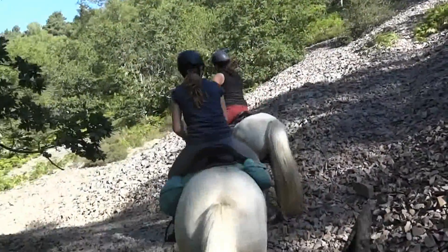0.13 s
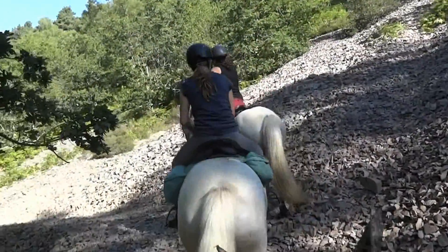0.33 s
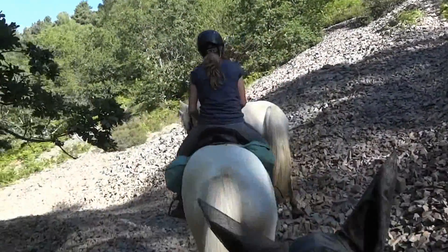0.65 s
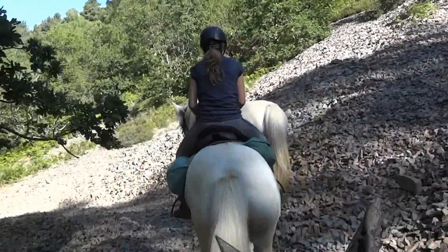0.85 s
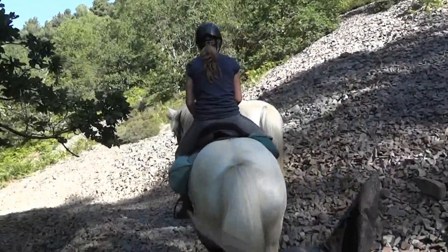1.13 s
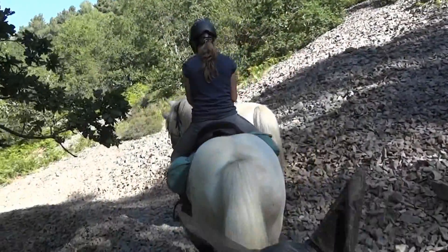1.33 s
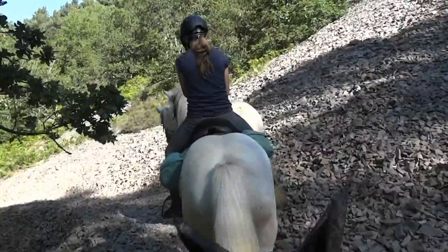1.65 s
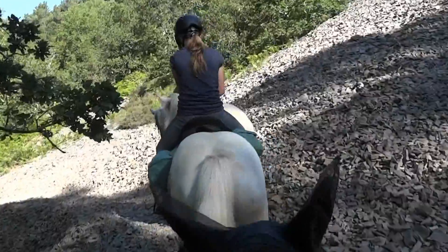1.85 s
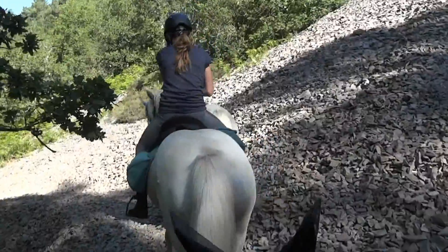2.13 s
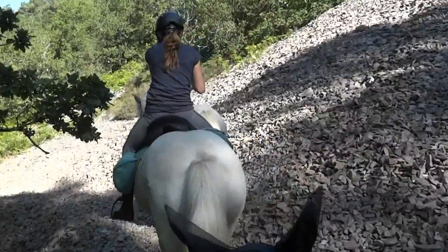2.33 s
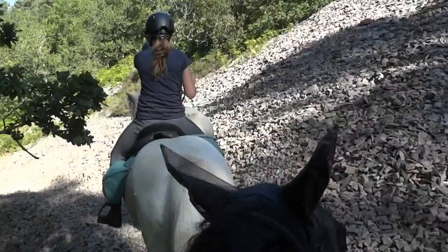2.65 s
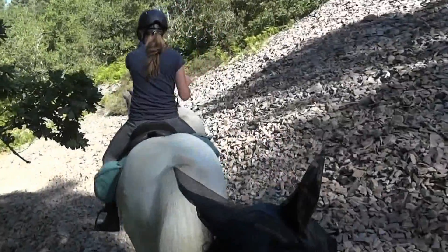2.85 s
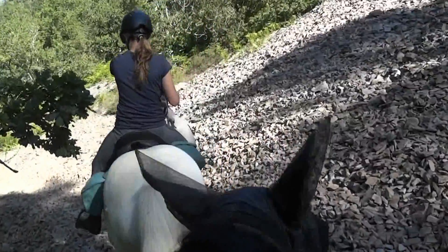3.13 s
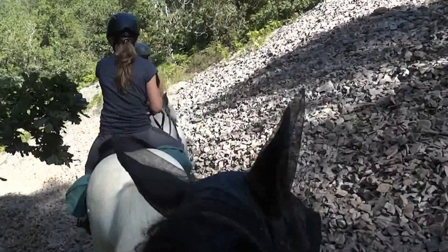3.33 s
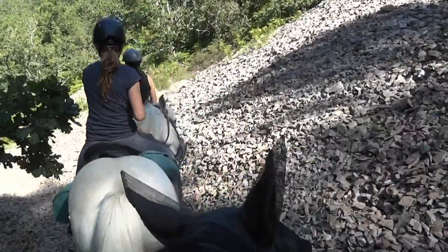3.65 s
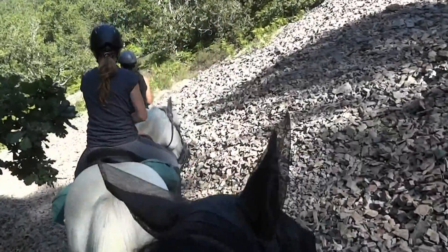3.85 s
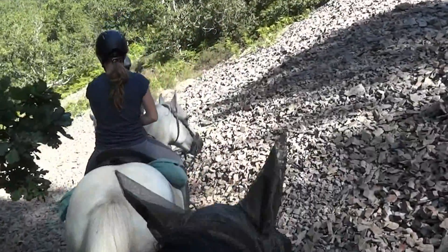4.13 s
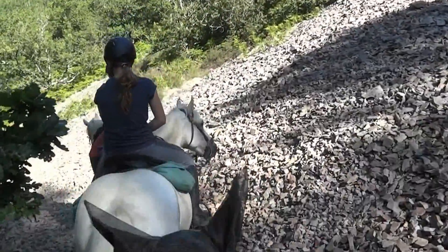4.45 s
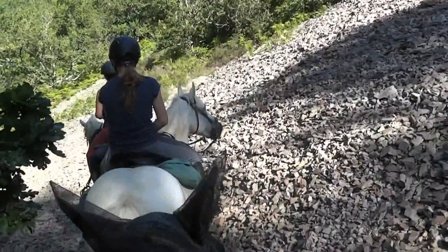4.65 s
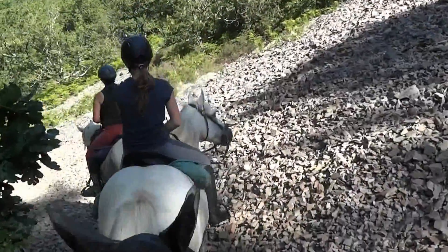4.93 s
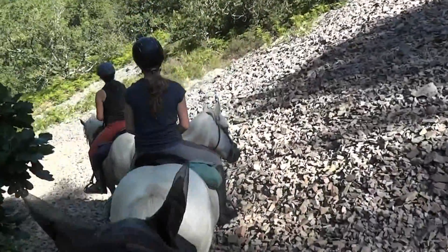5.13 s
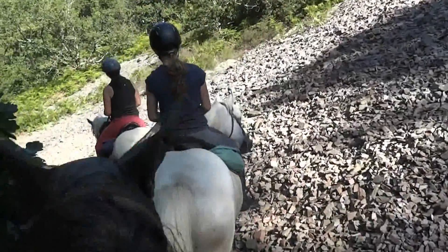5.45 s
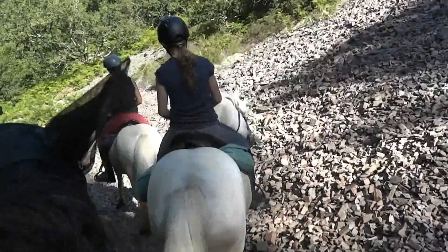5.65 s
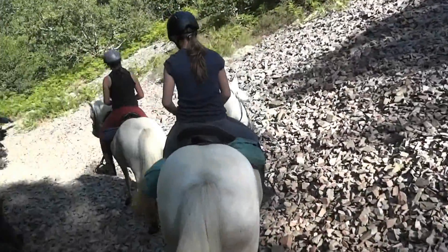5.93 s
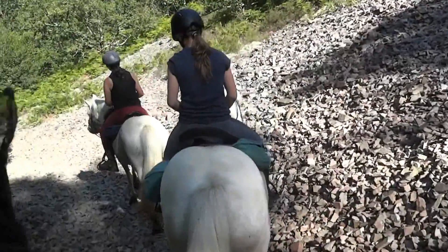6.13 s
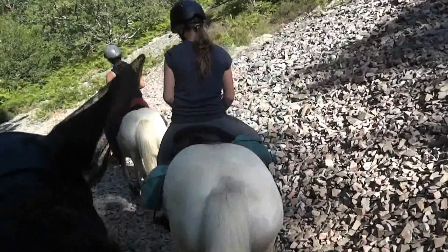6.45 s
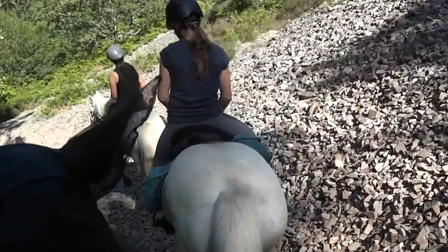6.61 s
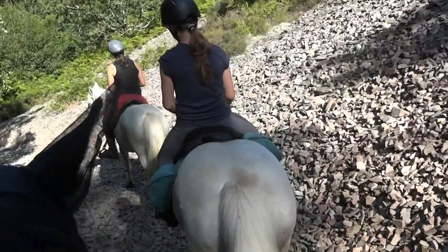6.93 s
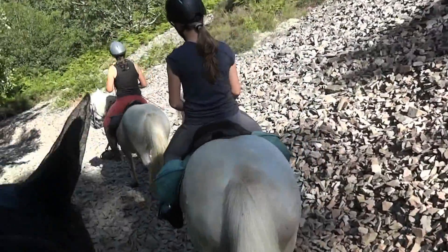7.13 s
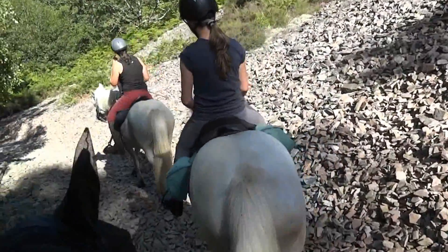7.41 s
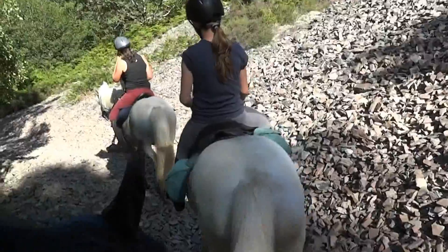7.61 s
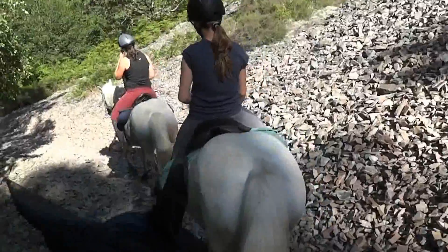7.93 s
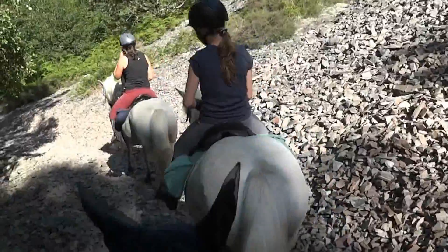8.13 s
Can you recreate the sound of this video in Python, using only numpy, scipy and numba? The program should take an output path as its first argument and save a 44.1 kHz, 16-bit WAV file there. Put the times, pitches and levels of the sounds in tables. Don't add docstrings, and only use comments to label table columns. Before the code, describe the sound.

From 0 s, already in full motion, horses' hooves crunch through loose stones on an outdoor slope, close around the microphone in the saddle. Thousands of tiny stone contacts make a dry, gritty, rattling bed, swelling and easing unevenly with overlapping steps. A hard clink and crush stands out at 0.6 s after a brief lull begins; heavy sinking crunches and knocks follow until about 3 s, with a strong slide near 3.3 s and a dip at 3.6 s. Around 4.5 s fine grit thins, leaving clearer pebble drags. A fuller slide comes at 5 s, then heavy stones fade and the texture turns lighter and brighter, with clinks at 6.0 and 6.6 s, a busy rattle from 7.1 to 7.3 s, and crisp crunches until the 8.3 s cut-off. The stereo leans slightly left; bass is weak, peaks compressed, the bank's scatter very short.

```python
import sys
import numpy as np
from scipy import signal
from scipy.io import wavfile
from scipy.ndimage import uniform_filter1d
from numba import njit

SR = 44100
rng = np.random.default_rng(int(sys.argv[2]) if len(sys.argv) > 2 else 0)


def master(y):
    cut = np.clip(np.atleast_2d(y).T, -1, 1)
    pcm = np.round(cut * 32767)
    wavfile.write(sys.argv[1], SR, pcm.astype(np.int16))


def amplitude_ratio(level_db):
    exponent = np.asarray(level_db, float) / 20
    return 10 ** exponent


N = 365148

# time in seconds, level against the mean in dB.
SLIDE = [(0.0, -4.5), (0.33, -3.5), (0.66, -14.5), (0.99, -4), (1.32, -6.5), (1.8, -4), (2.31, -8.5),
         (2.7, -4), (3.29, -1.5), (3.62, -12.5), (4.5, -8), (4.94, -3), (5.27, -8), (5.6, -6.5),
         (5.93, -8.5), (6.92, -10.5), (7.24, -3), (8.28, -9.5)]
# frequency in Hz, level in dB per Hz.
COLOUR = [(13, -70), (22, -32), (70, -33.5), (159, -10.5), (283, -5.5), (439, -5.5), (546, -6), (920, -1),
          (1280, -3), (3000, -0.5), (4910, -2), (6830, -8), (12800, -27), (15600, -37.5)]


def scree():
    grains, modes_each = 132000, 4
    contacts = grains // modes_each
    s = np.repeat(np.sort(rng.random(contacts)), modes_each) * N / SR
    blow = np.repeat(rng.exponential(1, contacts), modes_each)
    pick, turns, large = rng.random(grains), rng.random(grains), rng.exponential(1, grains)
    chance = rng.standard_normal((grains, 2)) * [9, 1]
    hz = (7 + pick * 119) ** 2
    t60 = 6.5 * 7.3 ** turns / hz + 0.0099

    level_db = np.interp(s, *np.transpose(SLIDE))
    heavy_db = -2.5 * np.maximum(s - 5, 0)
    grit_db = 1.2 + (0.51 - 1) * level_db
    grit_db += -2.5 * np.exp(-((s - 4.5) / 0.77) ** 4)
    heavy = np.clip(np.log2(900 / hz), 0, 1)
    grit = np.clip(np.log2(hz / 5000), 0, 1)
    slide = amplitude_ratio(level_db + heavy * heavy_db + grit * grit_db)
    drive = np.sqrt(slide ** 2 + crush_power(s, hz))

    uneven_db = 1.23 * np.minimum(large, 6.5) + 1.28 * np.minimum(blow, 5.5)
    uneven_db *= 1 - 0.4 * grit
    even = np.sqrt(np.sqrt(hz) / t60)
    return amplitude_ratio(-65.5) * strike(s, hz, t60, drive * even * amplitude_ratio(uneven_db), chance)


def crush_power(s, hz):
    # start in seconds, force in dB, stone pitch in Hz, length in seconds.
    steps = [(0.098, 1, 360, 0.13), (0.299, 3, 8000, 0.078), (0.314, -4.5, 1910, 0.1),
             (0.604, -2.5, 300, 0.16), (0.711, -2, 1010, .045), (0.985, -2, 2000, 0.063),
             (1.206, 1, 2660, 0.16), (1.328, -0.5, 380, 0.084), (1.859, -0.5, 590, 0.14),
             (2.383, -2, 3200, 0.054), (2.614, .5, 2160, 0.04), (3.726, -3, 1880, 0.16),
             (3.896, -3.5, 4030, 0.15), (4.169, 1.2, 3310, 0.11), (5.544, 0.5, 410, 0.11),
             (5.946, -1.5, 1690, 0.053), (6.009, -1, 3340, 0.061), (6.175, -2.5, 4970, 0.048),
             (6.208, 2, 3410, 0.13), (6.444, -9, 1100, 0.22), (6.625, -3.5, 5000, 0.098),
             (6.741, -1, 3500, 0.056), (6.812, 1.5, 10000, 0.079), (7.129, -4, 2460, 0.026),
             (7.151, -2.5, 1900, 0.036), (7.187, 1, 3500, 0.035), (7.612, 3.5, 7520, 0.047),
             (7.657, 0.5, 2870, .07), (7.763, -0.5, 830, 0.15), (7.969, 3.5, 9460, 0.12)]
    sinks = [(0.034, -0.5, 680, 0.058), (0.15, 6, 476, 0.095), (0.429, -2, 260, .031),
             (0.815, 4.5, 260, .11), (1.118, 5.5, 330, 0.035), (1.412, 9.5, 260, 0.023),
             (1.473, 1, 910, 0.077), (1.569, -3.5, 260, 0.12), (1.613, 7.5, 260, 0.018),
             (1.893, 8.5, 620, 0.019), (2.064, 4, 980, 0.021), (2.254, -6, 260, 0.14),
             (2.485, 7, 550, 0.018), (2.512, 2, 260, 0.16), (2.68, 1.5, 260, 0.081),
             (2.773, 7.5, 352, 0.084), (2.775, 1, 2800, 0.071), (2.981, -1.5, 300, .12),
             (3.12, 2.5, 840, 0.016), (3.574, -1, 700, 0.036), (3.616, 2, 262, .13), (4.016, -3, 280, 0.13),
             (4.726, -2.5, 400, 0.18), (4.905, 4, 940, 0.11), (7.094, 2, 710, .026),
             (8.242, 6.5, 920, .043)]
    drags = [(0.764, -3.5, 1350, .11), (1.662, -5.5, 2220, 0.05), (1.716, 3, 4200, 0.06),
             (1.985, -3, 6140, 0.051), (2.327, -4.5, 4940, 0.078), (2.72, 2, 1280, 0.015),
             (3.165, 3, 9420, 0.088), (3.267, 1.4, 3540, 0.081), (3.351, -1.5, 1950, 0.13),
             (3.656, 1, 5290, .03), (4.05, 5.5, 4210, 0.008), (4.355, 2.5, 6000, .015),
             (4.406, 2.5, 2150, 0.14), (4.566, 4.5, 1600, 0.067), (4.801, 5, 2680, 0.054),
             (4.986, 4.5, 1940, 0.17), (5.179, 2.5, 2190, .11), (5.239, 3.5, 2110, 0.045),
             (5.38, 2.5, 2090, .12), (5.691, 2, 10000, 0.1), (6.08, 2.5, 2550, 0.068),
             (6.557, -4, 2570, 0.033), (6.634, 9.5, 10000, 0.013), (6.889, 7, 7290, 0.055),
             (6.944, 7.5, 2670, 0.021), (6.962, 5, 10000, .11), (7.321, 2, 1360, 0.11),
             (7.528, 3.5, 2530, 0.091), (7.755, 4.5, 5060, 0.056), (8.121, 4, 2940, 0.098)]
    kicks = [(0.0, 0, 10000, 0.037), (0.6045, 6.5, 2250, 0.032), (0.696, 3, 5600, 0.017),
             (1.04, 4, 1750, .01), (1.208, 4.5, 1980, 0.039), (2.134, 0, 5500, 0.04),
             (2.454, 4, 10000, .21), (2.542, 4.5, 2200, 0.018), (2.932, 4, 300, 0.018),
             (3.0115, 2, 880, 0.0087), (3.366, 5.5, 2000, 0.012), (3.816, 6, 260, .01),
             (3.87, -1, 9000, .021), (4.259, 3.5, 304, 0.14), (4.748, 2.5, 3600, 0.0057),
             (5.113, -1, 1040, .029), (5.127, -2, 256, 0.038), (5.465, 4.5, 6000, 0.014),
             (5.545, 3, 2380, 0.039), (6.14, 7, 6190, 0.0046), (6.314, 3, 260, 0.024),
             (6.454, -5, 2800, 0.082), (7.303, 6.5, 2510, .03), (7.508, 2.5, 2550, 0.0057),
             (7.683, 2, 8630, .005), (8.051, 5, 2260, 0.025)]
    shoves = [(0.418, 1.5, 10000, 0.047), (0.497, 2, 10500, 0.056), (0.859, 9, 1890, 0.034),
              (0.898, 2, 9960, 0.16), (1.479, 9.5, 930, 0.026), (3.702, 1, 10000, .046),
              (4.005, 4, 780, 0.024), (4.161, 4, 1050, 0.031), (4.422, 12.5, 400, 0.032),
              (5.68, 1.5, 7300, 0.096), (5.735, 3, 330, 0.039), (5.7, 3, 4000, 0.12),
              (5.845, 1, 3770, 0.049), (5.918, 5, 10000, 0.0065), (6.36, 7, 2780, 0.0041),
              (6.705, 5.5, 3870, 0.036), (7.217, 3.5, 7650, 0.069), (7.396, 6.5, 1850, 0.034),
              (7.904, 5, 2860, 0.0093), (8.022, 8, 259, 0.024), (8.091, 5.5, 3780, 0.024)]
    slips = [
        (0.973, 0.5, 10000, .016),
        (1.785, 0.5, 3500, 0.044),
        (2.097, 2, 1500, 0.084),
        (2.455, 0, 3000, 0.017),
        (3.419, 2.5, 2500, 0.025),
        (3.811, -3, 2500, .018),
        (3.901, 1, 1050, 0.039),
        (5.326, -2, 2090, 0.026),
        (7.924, 3.5, 880, 0.012),
    ]
    # events, range of stone sizes in octaves, rise in seconds.
    moves = [(steps, 3.3, 0.0008), (sinks, 2.94, 0.012), (drags, 3.24, 0.016),
             (kicks, 0.7, 0.001), (shoves, 0.77, 0.008), (slips, 4.7, 0.0018)]
    power = np.zeros(len(s))
    for rows, octaves, rise in moves:
        for at, force_db, pitch_hz, length in rows:
            near = slice(*np.searchsorted(s, [at, at + 3 * length]))
            since = s[near] - at
            push = (1 - np.exp(-since / rise)) * np.exp(-(since / length) ** 3.9)
            push *= 1 + 1.66 * np.exp(-since / 0.014)
            sizes = np.exp(-(np.log2(hz[near] / pitch_hz) / octaves) ** 2) + 0.062
            power[near] += amplitude_ratio(force_db) ** 2 * push * sizes
    return power


def cracks():
    # time in seconds, peak level in dB.
    sharp = [(0.3004, -8), (0.604, -20), (0.821, -9), (1.1505, -6), (1.2087, -8), (1.484, -11), (1.86, -4),
             (2.0732, -11), (2.0986, -7), (2.4538, -4), (2.5426, -4), (2.7766, -7), (3.0118, -5.5),
             (3.1714, -10), (3.2024, -14), (3.2194, -8), (3.3844, -4), (3.7335, -5), (4.1714, -11),
             (5.8098, -10), (5.9384, -9), (5.9474, -7), (6.0127, -4), (6.0364, -8), (6.1415, -20),
             (7.3003, -6), (7.7054, -12), (8.0014, -11), (8.0264, -7), (8.1096, -10)]
    loose_count, modes = 500, 14
    loose = np.sort(rng.random(loose_count)) * N / SR
    luck = rng.exponential(1, loose_count)
    slide = amplitude_ratio(np.interp(loose, *np.transpose(SLIDE)))
    crush = np.sqrt(crush_power(loose, np.full(loose_count, 4000.)) + slide ** 2)

    sharp_s, sharp_db = np.transpose(sharp)
    s = np.repeat(np.r_[sharp_s, loose], modes)
    loose_size = crush * amplitude_ratio(-35.5 + 3.0 * np.minimum(luck, 4.5))
    size = np.repeat(np.r_[amplitude_ratio(sharp_db - 11.5), loose_size], modes)
    draw = rng.random((len(s), 2))
    hz = 600 + 13500 * (np.arange(len(s)) % modes + draw[:, 0]) / modes
    size = size * amplitude_ratio(-1.0 * np.log2(hz / 4000) + 10.0 * (draw[:, 1] - 0.5))
    t60 = 0.0046 * (1 + 2500 / hz)
    in_step = np.pi / 2 * np.array([1, 0]) + 0.6 * (draw - 0.5)
    return strike(s, hz, t60, size, in_step)


def far_stones():
    # time in seconds, peak level in dB, pitch in Hz.
    knocks = [(0.819, -16, 1106), (0.857, -14.5, 408), (1.147, -19, 450), (1.414, -24, 950),
              (2.383, -18, 980), (2.504, -19, 650), (2.526, -23, 276), (2.539, -11, 800), (2.62, -12, 880),
              (2.723, -13.5, 936), (2.819, -22, 880), (3.127, -15, 857), (3.902, -13, 1130),
              (4.185, -42, 100), (4.44, -32, 105), (4.527, -19, 1050), (4.949, -23, 940),
              (5.127, -11.5, 920), (5.145, -20, 250), (6.64, -36, 150), (7.53, -15, 914)]
    # time in seconds, peak level in dB, pitch in Hz.
    clinks = [(0.2997, -15, 2710), (0.604, 0.5, 2450), (0.8621, -9, 1820), (1.2135, -3, 1660),
              (1.487, -5, 2290), (1.7858, -3, 5200), (2.0738, -12, 3240), (2.0986, -1, 2050),
              (2.4544, -12, 5730), (2.7771, -9, 3930), (3.0115, -4, 1920), (3.1707, -13, 4100),
              (3.6616, -6, 2980), (3.733, -8, 5100), (4.1786, -11, 3060), (4.9092, -5, 2500),
              (5.402, -4, 3820), (5.5461, -5, 2630), (5.6925, -16, 4950), (5.947, -8, 2840),
              (6.0127, -7, 4970), (6.46, -5, 3020), (6.6272, -1, 2620), (6.8152, -8, 4390),
              (7.2999, -6, 2510), (7.5098, -8, 2250), (7.5323, -8, 3300), (7.7656, -11, 2970),
              (7.9264, -11, 1860), (7.9693, -8, 2940)]
    # time in seconds, peak level in dB, pitch in Hz.
    ticks = [
        (0.6389, -16, 5800),
        (0.9757, -11, 7800),
        (4.5876, -12, 6800),
        (5.749, -14, 5600),
        (5.922, -16, 7950),
        (6.8118, -12, 6900),
        (7.6833, -6.5, 7500),
        (5.939, -28, 8300),
        (8.027, -22, 10300),
    ]
    # pitch ratio, level in dB, share of ring time.
    stone = [
        (1, 2, 0.93),
        (1.15, -6, 0.84),
        (0.542, -10.5, 0.56),
        (0.76, -6, 0.12),
    ]
    return (single_stones(knocks, 0.079, -6.0, stone) + single_stones(clinks, 0.029, -12.0, stone)
            + single_stones(ticks, 0.011, -4.0, stone))


def near_stones():
    # time in seconds, peak level in dB, pitch in Hz.
    chips = [(0.0231, -32, 10270), (0.1329, -35, 12530), (0.1873, -31, 11020), (0.3, -17, 6360),
             (0.3389, -24, 9400), (0.4347, -33, 11900), (0.4452, -34, 12900), (0.5165, -32, 11280),
             (0.5834, -44, 12400), (0.6677, -45, 13910), (0.947, -26, 9650), (0.978, -30, 10270),
             (0.9959, -29, 10400), (1.2124, -35, 11530), (1.2858, -31, 11020), (1.7462, -15, 6770),
             (1.9039, -23, 7640), (2.1498, -28, 8020), (2.3539, -40, 13910), (2.3908, -42, 13410),
             (2.5135, -20, 7270), (2.6217, -29, 11530), (2.7854, -22, 7270), (2.928, -35, 11530),
             (2.9969, -34, 10770), (3.0463, -29, 11400), (3.1216, -28, 9150), (3.173, -20, 8770),
             (3.3725, -26, 10020), (3.3835, -24, 9770), (3.5007, -38, 11650), (3.811, -41, 13030),
             (3.819, -33, 9650), (3.8739, -22, 7890), (4.3633, -23, 7020), (5.3431, -36, 10020),
             (5.4668, -24, 9900), (5.5446, -38, 13030), (5.5651, -39, 13660), (5.7202, -37, 13910),
             (5.7501, -18, 7770), (5.9237, -41, 12900), (5.9646, -41, 13530), (6.1422, -32, 12900),
             (6.2166, -17, 6770), (6.3158, -36, 12150), (6.6391, -33, 10900), (6.7259, -20, 7270),
             (6.8127, -25, 9650), (6.9, -30, 8640), (7.0173, -38, 13530), (7.0621, -29, 10150),
             (7.13, -33, 10400), (7.2213, -24, 7640), (7.2442, -36, 12530), (7.6214, -20, 7640),
             (7.6363, -22, 8900), (7.6628, -37, 13150), (7.769, -39, 13410), (8.0245, -24, 10150)]
    # time in seconds, peak level in dB, pitch in Hz.
    pebbles = [(0.156, -12, 1880), (0.3097, -15, 4380), (0.6399, -18, 4450), (0.7258, -19, 5010),
               (0.8624, -15, 3510), (1.2336, -14, 1690), (1.2775, -16, 3000), (1.497, -22, 4760),
               (1.6187, -21, 2130), (1.6327, -16, 5450), (1.7365, -12, 4320), (1.7853, -20, 5890),
               (2.1086, -16, 2380), (2.364, -16, 5250), (2.5127, -19, 2630), (2.7911, -14, 3130),
               (2.9018, -19, 5260), (3.1882, -15, 5320), (3.247, -18, 2630), (3.3847, -18, 2420),
               (3.4994, -18, 4950), (3.9105, -18, 5760), (4.0562, -19, 5750), (4.1949, -15, 5890),
               (4.5171, -18, 1870), (4.595, -14, 4730), (4.8095, -18, 4950), (4.9272, -15, 4380),
               (5.02, -14, 2570), (5.037, -14, 2940), (5.2016, -14, 4380), (5.2774, -15, 3190),
               (5.4021, -19, 5890), (5.4101, -10, 3880), (5.441, -11, 2550), (5.7503, -18, 2510),
               (5.9549, -20, 4700), (6.0367, -16, 3510), (6.1434, -18, 5640), (6.2143, -17, 5890),
               (6.2532, -15, 5350), (6.332, -15, 3570), (6.4587, -17, 2200), (6.4807, -24, 4130),
               (6.5804, -19, 2190), (6.6433, -10, 5320), (6.9636, -14, 2690), (7.0224, -12, 4640),
               (7.1342, -10, 2130), (7.1531, -13, 1820), (7.1641, -14, 1630), (7.197, -16, 3190),
               (7.5892, -13, 5500), (7.64, -14, 1830), (7.7697, -12, 5760), (7.7797, -15, 3510),
               (7.8186, -12, 5440), (7.9264, -16, 2180), (8.0541, -16, 1440), (8.0641, -16, 2630)]
    # time in seconds, peak level in dB, pitch in Hz.
    bumps = [(0.1778, -14, 1220), (0.4544, -24, 745), (1.1483, -20, 1200), (1.2345, -22, 470),
             (1.4181, -18.5, 570), (1.595, -30, 220), (1.6268, -20, 620), (1.8989, -25, 470),
             (1.9488, -21, 995), (2.5224, -30, 280), (2.5429, -18, 1270), (2.8127, -22, 360),
             (2.8739, -23.5, 520), (3.0122, -22, 496), (3.1279, -17, 1130), (3.1528, -32, 220),
             (3.5927, -31, 220), (3.6245, -25, 550), (3.9057, -20, 856), (4.0485, -22, 945),
             (4.4159, -19.5, 440), (4.5769, -17, 1060), (4.9238, -23, 1190), (4.9465, -24, 330),
             (5.0961, -19, 1170), (5.1256, -28, 690), (5.1438, -22, 250), (5.3841, -22, 860),
             (6.01, -22, 1250), (6.2526, -16, 1120), (7.0757, -32, 220), (7.1279, -23, 1160),
             (7.1982, -27, 800), (7.9306, -16, 1050), (7.9714, -25, 630), (8.0531, -21, 800)]
    # pitch ratio, level in dB, share of ring time.
    chip = [
        (1, 2.5, 1),
        (1.07, -7.5, 0.73),
        (0.92, -4.5, 0.82),
        (0.8, -14, 0.2),
    ]
    return (single_stones(chips, 0.014, -1.0, chip) + single_stones(pebbles, 0.032, -4.5, chip)
            + single_stones(bumps, 0.06, -3.5, chip))


def single_stones(rows, t60, db, modes):
    s, peak_db, hz = np.repeat(np.transpose(rows), len(modes), axis=1)
    draw = rng.standard_normal((len(s), 3))
    ratio, mode_db, lasting = np.tile(modes, (len(rows), 1)).T
    detune = 1 + 0.033 * draw[:, 2] * (ratio != 1)
    mode_hz = np.minimum(hz * ratio * detune, 15000)
    size = amplitude_ratio(peak_db + db + mode_db - read(COLOUR, hz))
    return strike(s, mode_hz, t60 * lasting, size, draw[:, :2] * 0.5)


def strike(s, hz, t60, size, chance):
    # frequency in Hz, lead in radians.
    left_lead = [(0, 0.042), (780, 0.042), (6200, 0.2), (15200, 0.024)]
    # frequency in Hz, spread in radians.
    scatter = [(100, 0.05), (400, 0.46), (900, 0.39), (2500, 0.19), (8000, 0.087), (14000, 0.059)]
    # time in seconds, left over right in dB.
    place = [
        (0.0, 1.5),
        (1.13, 0.5),
        (4.27, 2),
        (6.71, 1.5),
        (7.03, 2.5),
        (7.79, -0.5),
        (8.28, 0.5),
    ]
    spread = read(scatter, hz) * chance[:, 1]
    pan_db = np.interp(s, *np.transpose(place)) * np.clip(hz / 700, 0, 1) + spread
    lead = read(left_lead, hz) + spread
    sides = np.array([0.5, -0.5])
    fade = np.clip(amplitude_ratio(-60 / (t60 * SR)), 0, 1 - 1e-4)
    sizes = size[:, None] * amplitude_ratio(pan_db[:, None] * sides)
    phases = chance[:, :1] + lead[:, None] * sides
    return ring((s * SR).astype(np.int64), 2 * np.pi * hz / SR, fade, sizes, phases, N)


@njit
def ring(start, turn, fade, size, phase, length):
    out = np.zeros((2, length))
    for g in range(len(start)):
        step = fade[g] * np.exp(1j * turn[g])
        z = 1 + 0j
        left = size[g, 0] * np.exp(1j * phase[g, 0])
        right = size[g, 1] * np.exp(1j * phase[g, 1])
        for n in range(start[g], min(length, start[g] + int(-5 / np.log(fade[g])))):
            out[0, n] += (z * left).imag
            out[1, n] += (z * right).imag
            z *= step
    return out


def bank_scatter(x):
    t = np.arange(4000) / SR
    tail = rng.standard_normal((2, len(t))) * amplitude_ratio(-60 * t / 0.026) * (t > 0.002)
    tail += uniform_filter1d(tail.mean(0) - tail, size=80, axis=1)
    tail = tail / np.linalg.norm(tail[0])
    return signal.oaconvolve(x.mean(0)[None], tail, axes=1)[:, :N]


def coloured(x):
    hz = abs(np.fft.fftfreq(8192, 1 / SR))
    gain = np.log(amplitude_ratio(np.maximum(read(COLOUR, hz), -80)))
    taps = np.fft.ifft(np.exp(gain - 1j * signal.hilbert(gain).imag)).real[:2048]
    return signal.oaconvolve(x, taps[None], axes=1)[:, :N]


def read(points, hz):
    f, value = np.transpose(points)
    return np.interp(np.log(hz + 1), np.log(f + 1), value)


def scene():
    stones = scree() + far_stones() + cracks()
    far = stones + amplitude_ratio(-11.5) * bank_scatter(stones)
    return coloured(far + near_stones())


def low_pass(x):
    return signal.sosfilt(signal.butter(12, 15710, fs=SR, output="sos"), x)


def record(dry):
    mix = 0.79 * np.tanh(dry / 0.83)
    return low_pass(mix)


dry = scene()
out = record(dry)
master(out)
```